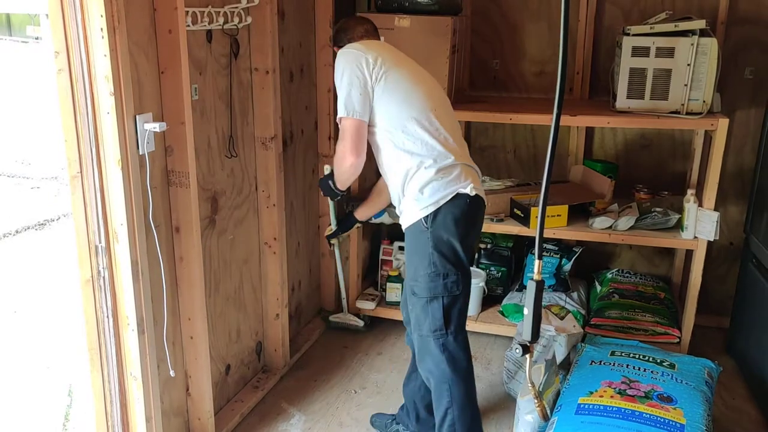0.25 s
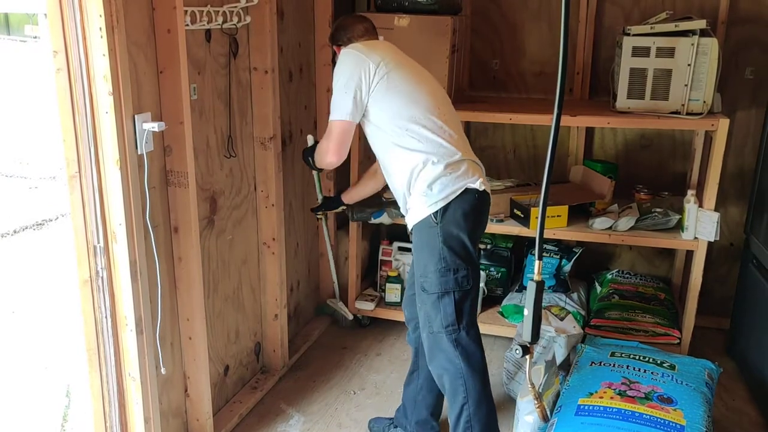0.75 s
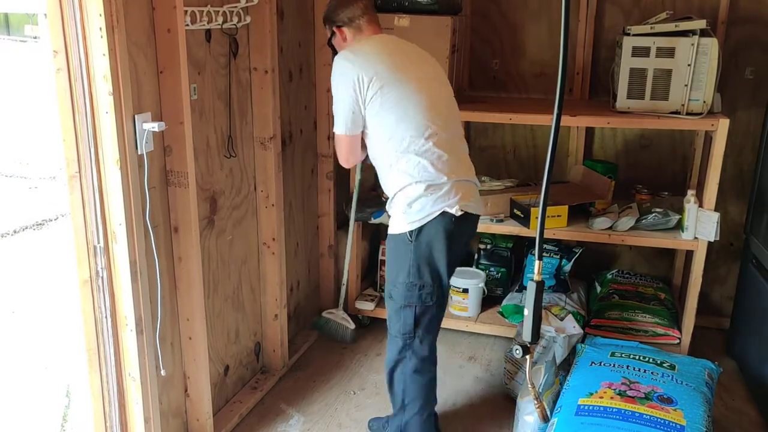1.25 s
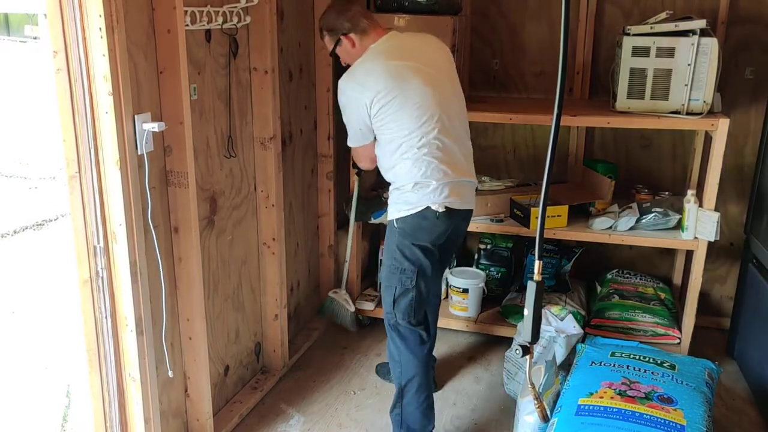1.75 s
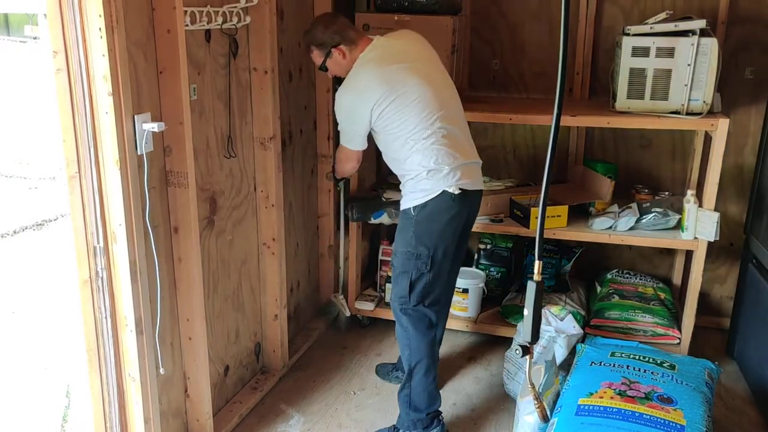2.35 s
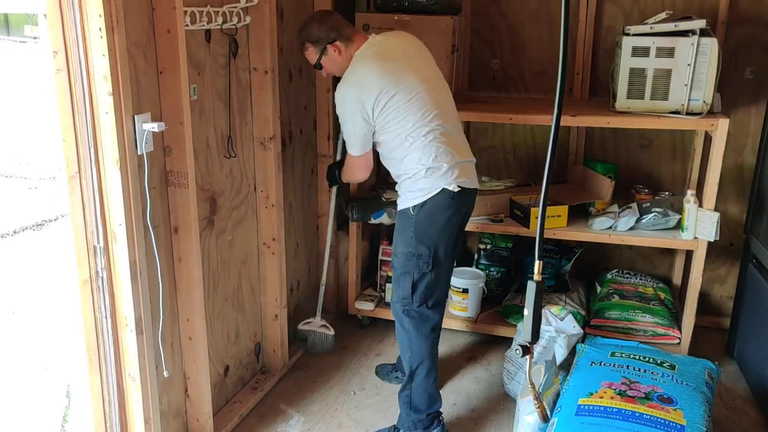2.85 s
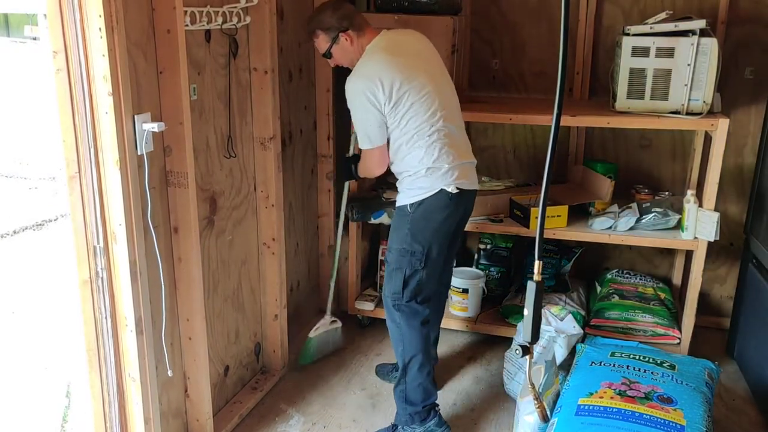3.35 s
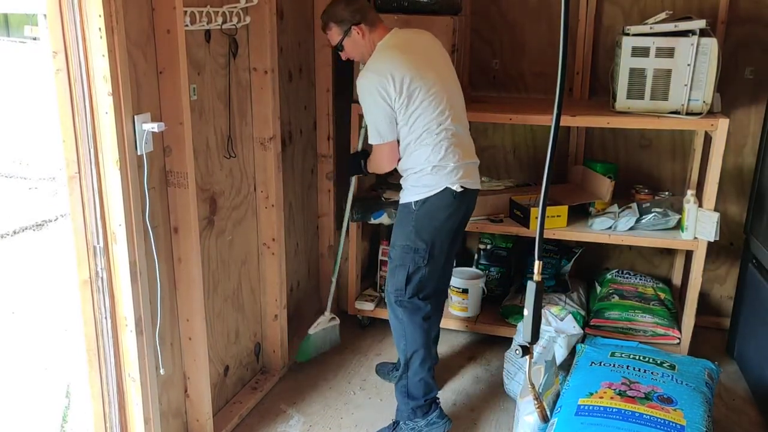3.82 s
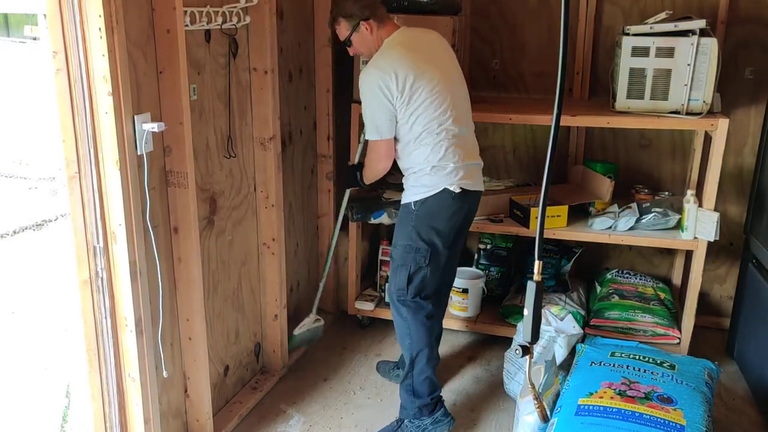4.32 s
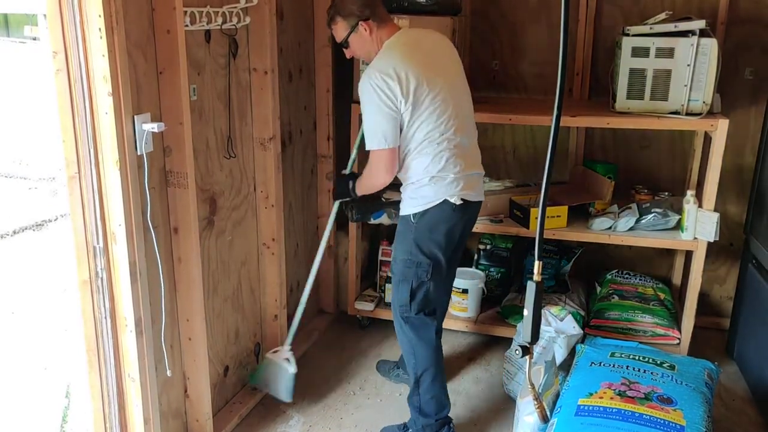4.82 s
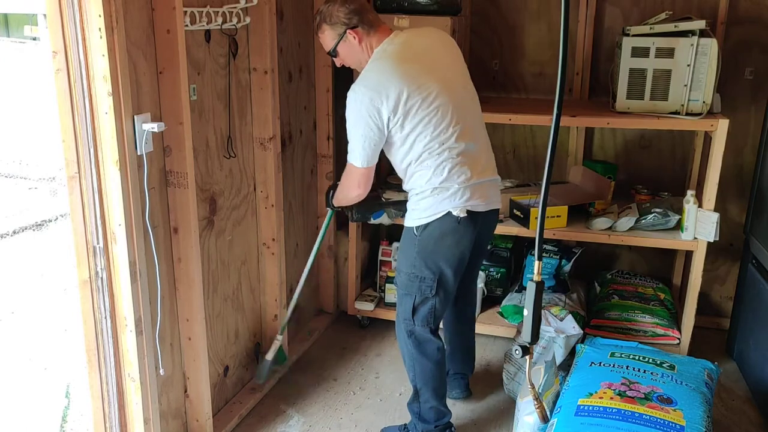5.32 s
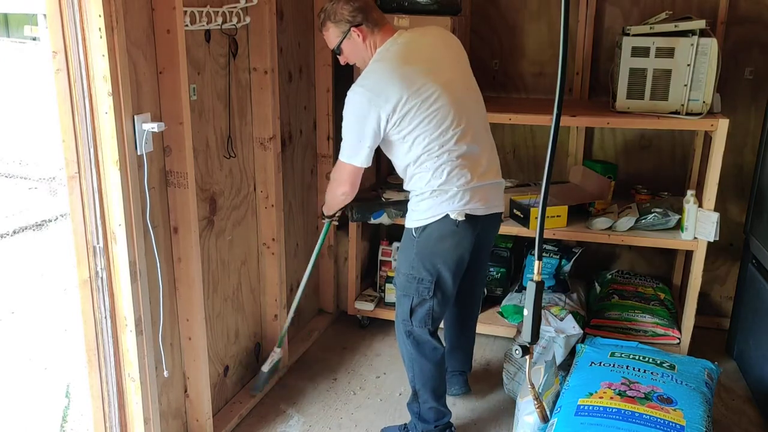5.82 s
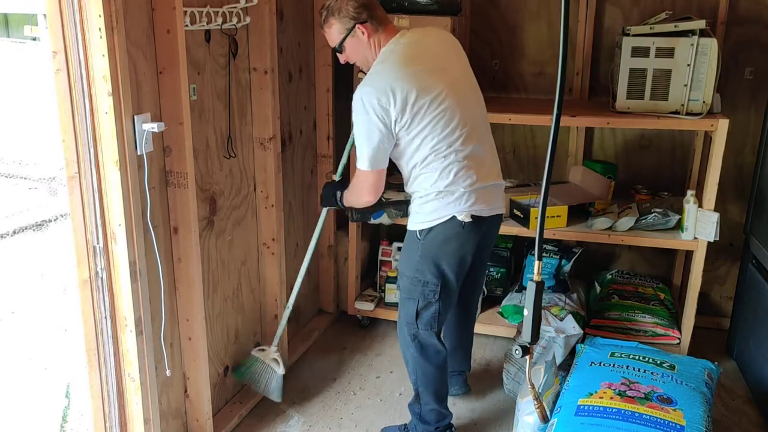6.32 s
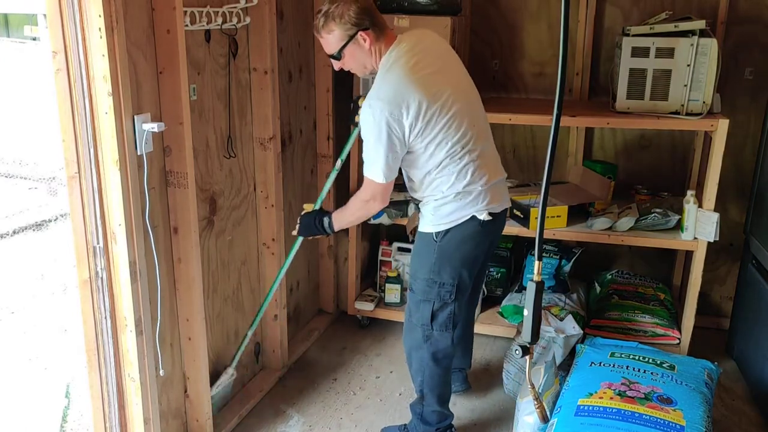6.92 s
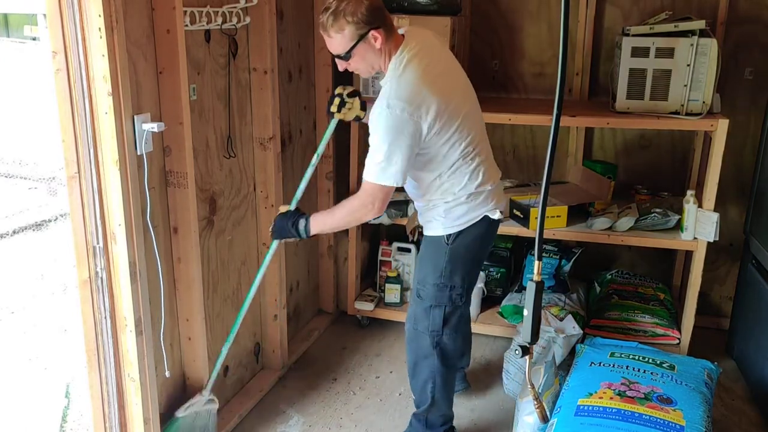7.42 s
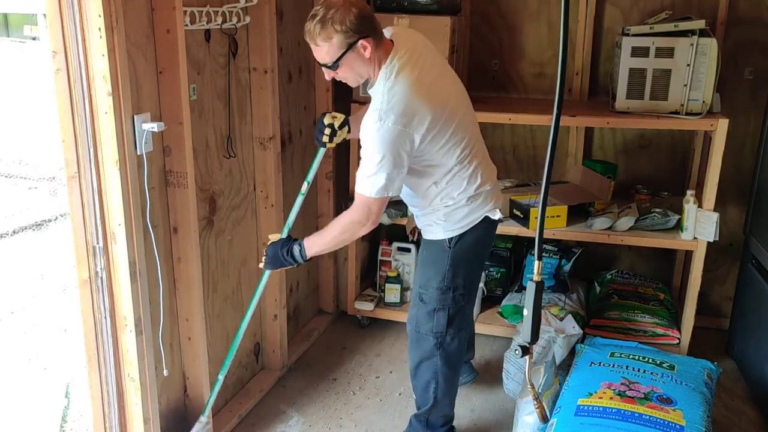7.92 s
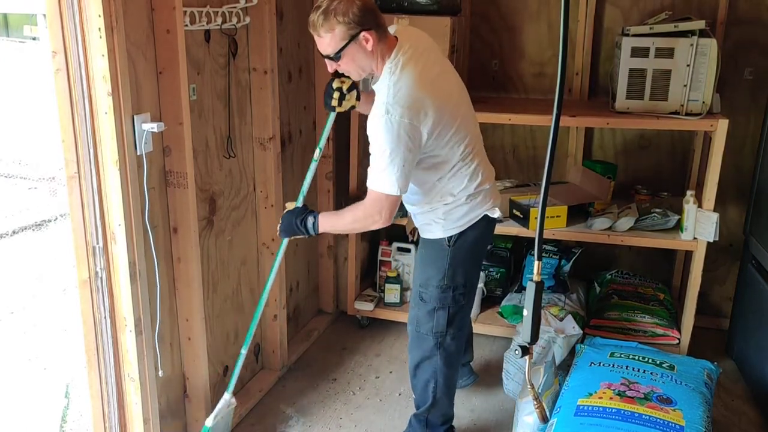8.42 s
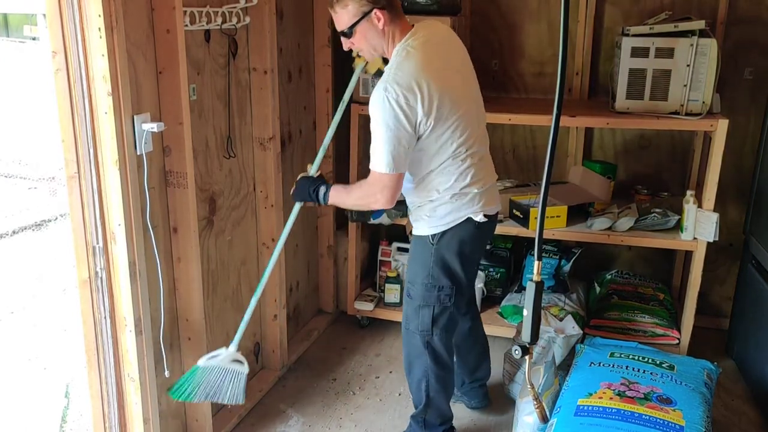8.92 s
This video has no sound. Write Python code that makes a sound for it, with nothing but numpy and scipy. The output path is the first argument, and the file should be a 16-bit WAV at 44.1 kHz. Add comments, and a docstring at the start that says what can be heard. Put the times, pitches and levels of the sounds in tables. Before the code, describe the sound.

A few steps from a stereo microphone, someone sweeps a small wooden shed. Brisk dry bristle scrapes come first, then hollow knocks around two and a half seconds, a cluster of bright grit clicks, and a double clack past five. After a softer patch, strong separate strokes return with thumps and low, trembling rumble through the boards. Close, short room echo; very quiet background; sound leans slightly left.

```python
"""Inside a small wooden shed, a broom sweeps a plank floor along a stud wall.
Shaped noise with sparse slips makes the bristles hiss and scratch and the planks answer; joists rumble as noise.
The broom head knocks and grit ticks: short band-passed clicks that ring the modes of studs and panels.
Two beating tones near 28 and 23 Hz make the whole shed shudder. A stereo microphone stands a few steps away."""
import sys
import numpy as np
from scipy import signal
from scipy.fft import rfft, irfft, next_fast_len
from scipy.io import wavfile
from scipy.ndimage import uniform_filter1d, map_coordinates

SR = 44100
rng = np.random.default_rng(int(sys.argv[2]) if len(sys.argv) > 2 else 0)


def pcm_store(signal):
    """Save signal as 16-bit PCM."""
    levels = np.round(np.clip(np.atleast_2d(signal), -1, 1) * 32767)
    wavfile.write(sys.argv[1], SR, levels.astype(np.int16).T)


def gain_from_db(level_db):
    """Convert decibel levels to linear amplitude factors (20 dB per decade)."""
    decades = np.asarray(level_db, float) / 20
    return 10 ** decades


N = 404397
TIME = np.arange(N) / SR  # s

# idle shed and the air outside: f/Hz, relative density/dB
QUIET_COLOUR = [(35, -34), (60, 6), (91, -8.5), (389, -10), (767, -15.5), (4530, -19.5), (6430, -26.5),
                (8710, -32.5), (14900, -26), (16000, -37)]
QUIET_DB = -60  # mean level of the bed
# likeness of the two microphone ports: f/Hz, likeness/1
PORT_LIKENESS = [(60, 0.93), (150, 0.93), (300, .85), (600, 0.47), (1200, 0.035), (4000, 0.022),
                 (12000, 0.017)]

# bristle strokes: fullest contact t/s, rise/s and fade/s over 20 dB (signs ignored), scratch level/dB, tip level/dB
STROKES = [(.056, 0.1, 0.15, -38.5, -51.5), (.208, 0.03, 0.17, -42.5, -50), (0.453, .8, 0.1, -50, -59),
           (.78, .1, 0.09, -41.5, -56), (1.042, 0.11, 0.14, -43.5, -55.5), (1.28, .03, 0.13, -41, -51.5),
           (1.616, 0.03, 0.24, -48, -77), (1.758, 0.6, -0.5, -54, -61), (1.868, .012, .3, -38, -41),
           (1.895, .08, .16, -37, -38), (2.029, 0.01, 0.18, -37.5, -55), (2.356, .015, .3, -46.5, -56),
           (2.426, 0.15, 0.2, -45, -56), (2.721, 0.08, -0.7, -46, -63), (2.866, .11, 0.72, -40, -51),
           (3.042, .006, 0.37, -39.5, -55.5), (3.44, .3, .35, -42, -70), (3.61, .01, .2, -45, -62),
           (3.69, .12, .3, -47, -60), (3.87, .45, .24, -45, -59), (4.048, .02, 0.33, -42.5, -59),
           (4.19, 0.1, 0.14, -57, -57), (4.39, .03, 0.33, -47.5, -54), (4.528, 0.3, 0.22, -55, -61.5),
           (4.975, .02, .3, -55, -62), (5.035, .1, .35, -51, -60), (5.116, .006, .17, -44, -49),
           (5.27, .012, .15, -47, -62), (5.312, .06, .2, -42, -60), (5.566, 0.55, .065, -49, -52),
           (5.826, .008, .3, -52, -54), (5.87, .06, .36, -46, -52), (6.151, -0.12, .26, -47, -55),
           (6.278, 0.06, 0, -55, -56), (6.49, .12, .2, -55.5, -58), (6.7, .2, 0.22, -52, -56),
           (6.709, -0.01, 0.14, -36.5, -51), (7.02, .06, 0.7, -48, -56), (7.5, 0.04, 0.56, -50.5, -58),
           (7.568, 0.04, 0.18, -39.5, -44.5), (7.937, 0.14, 0.2, -40, -45.5), (8.27, 0.15, 0.28, -41, -48),
           (8.47, -0.03, 0.05, -42.5, -60), (8.647, 0.07, 0.31, -47, -50), (8.731, .008, 0.13, -35, -45.5),
           (8.9, .015, .2, -47, -58), (8.975, .11, .115, -39.5, -57)]
TIPS_STEEPER = 1.19  # the tip hiss comes and goes this much faster than the scratch
# colours of bristle scratch, fine tip hiss and floor planks: f/Hz, relative density/dB
SCRATCH_COLOUR = [(700, -8), (1300, -3.5), (2500, -3.5), (4200, -1.5), (5200, -6), (6800, -11),
                  (8500, -27.5), (12000, -22.5)]
TIP_COLOUR = [(3500, -10), (6500, 19.5), (9000, 11.5), (12000, 11), (15500, 15.5), (17000, -34)]
PLANK_COLOUR = [(250, -20), (420, -3), (700, -1), (1100, 0), (1700, -4), (2600, -14), (5000, -35)]
# what the planks take up of the scratch as the broom moves along: t/s, level over scratch/dB
PLANK_UPTAKE = [(0, -8.5), (.3, -10), (.8, -12), (1.1, -19), (1.6, -14), (2.1, -16), (2.7, -7), (2.9, -6.5),
                (3.8, -4), (4.15, -12), (4.9, -6), (5.08, -3), (5.4, -4.5), (6.2, -11), (7.2, -8),
                (7.53, -0.5), (8, -6.5), (8.33, -3), (8.7, -15), (9.04, 0)]

# jolts from the sweeper's weight and the landing broom: t/s, peak shudder level/dB, joist rumble level/dB
JOLTS = [(.04, -60, -44.5), (.2, -41, -44), (.59, -60, -57), (.79, -58, -53), (1.0, -60, -55),
         (1.27, -38, -49), (1.43, -49, -50), (1.62, -46, -45), (1.73, -52, -48), (2.02, -28, -54),
         (2.36, -38, -55), (2.7, -40, -60), (3.05, -56, -52), (3.31, -34.5, -51), (3.55, -50, -52),
         (3.72, -30, -45), (4.045, -29, -57), (4.375, -28.5, -58), (4.76, -46, -47), (5.0, -40, -52),
         (5.28, -50, -39), (5.48, -35, -52), (5.86, -38.5, -59), (6.18, -34.5, -61), (6.7, -27.5, -44),
         (7.06, -29, -49), (7.38, -48, -58), (7.5, -55, -47), (7.565, -22.5, -44), (7.915, -23, -54),
         (8.25, -22, -42), (8.57, -41, -60), (8.72, -24.5, -51), (8.92, -48, -42)]
SHUDDER_HZ = 28  # nominal upper of the two shudder modes
BEAT_HZ, NEIGHBOUR = 5.4, .62  # the neighbouring mode: how far below in Hz, and its relative amplitude
SHUDDER_T60, NEIGHBOUR_T60 = .85, .85  # ring times in s
IDLE_DB = -63  # the shed never quite rests: mean peak level
# humps of the floor joists: f/Hz, relative density/dB
JOIST_COLOUR = [(35, -18), (52, -1), (75, 3.5), (105, -4), (155, -1.6), (205, -8), (255, -4), (330, -9),
                (420, -10), (600, -24.5), (1000, -92)]
JOIST_LAG_S, JOIST_RISE_S, JOIST_FADE_S = .03, .07, .36  # peak after the jolt; rise and fade over 20 dB

# broom head on wood, levels before the contact mix: t/s, tick level/dB, thud level/dB, thud f/Hz, knock level/dB
HEAD_KNOCKS = [(.194, -46, -35.5, 150, -43.5), (.269, -44, -36.5, 124, -51), (.5824, -52, -45, 160, -62),
               (1.267, -21.5, -32.5, 237, -40.5), (1.4139, -49, -37, 163, -49.5),
               (1.6155, -32, -57, 245, -40.5), (1.735, -55, -41, 140, -61), (2.029, -24, -34, 135, -34),
               (2.359, -30.5, -45, 433, -45), (2.4109, -28, -31, 357, -23.5),
               (2.7082, -30, -28, 457, -21.5), (2.7185, -33, -24.5, 188, -24.5),
               (3.0436, -18, -46, 390, -36.5), (3.2694, -38, -37.5, 165, -46.5),
               (3.4313, -35, -43, 161, -50), (4.044, -40, -42, 134, -43.5), (4.092, -33.5, -44.5, 136, -46),
               (4.35, -58, -52, 150, -66), (4.3818, -28.5, -43.5, 115, -41.5), (4.58, -58, -49, 260, -64),
               (4.7617, -47, -33.5, 243, -53), (5.1134, -17, -57, 386, -44.5),
               (5.2727, -25.5, -27, 147, -39), (5.3052, -16, -26, 140, -33), (5.4859, -35, -38.5, 149, -42),
               (5.8242, -46, -51, 145, -54), (6.153, -38, -49.5, 147, -51), (6.7055, -30, -34, 165, -40),
               (7.0644, -33, -36.5, 147, -40.5), (7.5648, -22.5, -33, 175, -40),
               (7.9244, -19.5, -44, 159, -41.5), (7.9977, -23, -25.5, 410, -27.5),
               (8.2548, -25, -38, 164, -37), (8.297, -26, -22.5, 422, -20), (8.7303, -31, -47.5, 267, -36),
               (8.912, -33, -42, 145, -50), (8.972, -29, -48, 144, -39)]
# grit flicked against the wood, and the bright ticks of a few head knocks, before the contact mix: t/s, tick
# level/dB, tick f/Hz
GRIT_TICKS = [(.194, -28.5, 3800), (1.2496, -38, 4010), (3.162, -23.5, 4000), (3.2153, -27, 4420),
              (3.4305, -24, 4570), (3.445, -21, 3570), (3.5148, -28.5, 1570), (3.569, -23.5, 4250),
              (3.609, -16.5, 3900), (3.8498, -21, 4200), (3.8765, -19, 4260), (3.9534, -32.5, 4360),
              (4.1936, -28, 3860), (5.1134, -21, 3200), (5.386, -31, 2040), (5.591, -32, 4300),
              (5.824, -36, 4570), (5.87, -34, 3000), (5.97, -35, 2500), (6.036, -30, 3600),
              (6.1, -33, 4790), (6.7055, -22.5, 4380), (6.9555, -32, 2170), (7.224, -34.5, 2010),
              (7.3257, -31.5, 2380), (7.436, -34, 2440), (8.138, -24.5, 7060), (8.4646, -31, 2720),
              (8.6487, -21.5, 4140)]
# nominal modes of the stud wall: f/Hz
WALL_MODES = np.array([70, 120, 141, 165, 192, 235, 255, 277, 330, 380, 400, 428, 505, 570, 607, 660, 712,
                       780, 841, 903, 938, 1034, 1120, 1224, 1340, 1500, 1680, 1850, 2060, 2400])
UPPER_MODES = WALL_MODES > 460  # these knock, the lower ones thud
HEAD_TICK_HZ = 1680
HEAD_TICK_WIDE, GRIT_TICK_WIDE = 1.1, 1.3  # bandwidth over centre, per filter pass: the head clacks, grit clicks
GRIT_THUD_DB, GRIT_THUD_HZ, GRIT_KNOCK_DB = -35, 150, -27.5  # what a grain stirs in the wall, dB over its tick
CONTACT_SIZE = SR // 3  # samples in one contact
# what reaches the microphone of a tick: f/Hz, relative level/dB
TICK_AIR = [(300, -20), (1200, 0), (5200, 0), (7500, -12), (16000, -22)]
# decay of the shed's echo: f/Hz, t60/s
ECHO_T60 = [(100, 0.13), (500, 0.27), (2000, 0.28), (6000, 0.063), (14000, 0.089)]
# first answers of the near walls: nominal delay t/s, level/dB
NEAR_WALLS = [(.0034, -5), (.0056, -7), (.0093, -9), (0.0133, -5)]
# balance of the stereo image: f/Hz, left over right level/dB
LEFT_TILT = [(60, .2), (250, .4), (640, 1.8), (1400, 3), (3000, 3.4), (5500, -.5), (10000, 1.4),
             (15000, 1.2)]


def unit(x):
    """Scale to rms 1."""
    return x / np.sqrt(np.mean(x ** 2) + 1e-20)


def along(points, hz):
    """Read (Hz, value) points on a log frequency axis."""
    f, value = np.transpose(points)
    return np.interp(np.log(hz + 1), np.log(f + 1), value)


def wobble(rate):
    """Draw a smooth random curve with rate knots a second."""
    knots = rng.standard_normal(int(N * rate / SR) + 4)
    return map_coordinates(knots, [np.arange(N) * rate / SR])


def filtered(x, response):
    """Multiply the spectrum of x by a response of frequency."""
    m = next_fast_len(N + SR // 2)
    return irfft(rfft(x, m) * response(np.fft.rfftfreq(m, 1 / SR)), m)[..., :N]


def port_angle(hz):
    """Mid/side angle that gives the ports their likeness at each frequency."""
    return np.arccos(np.clip(along(PORT_LIKENESS, hz), -1, 1)) / 2


def spread(pair, colour):
    """Colour two unrelated signals and mix them to the likeness of the ports, rms 1."""
    def response(hz):
        return gain_from_db(along(colour, hz)) * [np.cos(port_angle(hz)), np.sin(port_angle(hz))]
    mid, side = filtered(pair, response)
    return unit(np.array([mid + side, mid - side]))


def swells(peak_s, level_db, rise, fade):
    """Level in dB of events that each climb to their peak and fade, added by power."""
    t = np.arange(0, N / SR + .002, .001)
    late = t - np.asarray(peak_s)[:, None]
    rise, fade = np.abs(np.reshape(rise, (-1, 1))), np.abs(np.reshape(fade, (-1, 1)))
    span = np.where(late < 0, rise, fade) + 1e-4
    event_db = np.asarray(level_db)[:, None] - 20 * np.abs(late) / span
    power = gain_from_db(2 * event_db).sum(0)
    return np.interp(TIME, t, 10 * np.log10(power + 1e-14))


def quiet():
    """The idle shed and the air outside: coloured noise whose level drifts slowly."""
    return gain_from_db(QUIET_DB + 1.4 * wobble(3.27)) * spread(rng.standard_normal((2, N)), QUIET_COLOUR)


def slips(per_s, spread_db, share):
    """Noise of countless bristles; sparse slips of uneven size carry the given share of its power."""
    sizes = gain_from_db(spread_db * np.minimum(rng.exponential(size=N), 3))
    snaps = (rng.random(N) < per_s / SR) * sizes
    flick = signal.lfilter([1], [1, -np.exp(-1 / (.0008 * SR))], snaps)  # decays with a 0.8 ms time constant
    return rng.standard_normal((2, N)) * np.sqrt(1 - share + share * unit(flick) ** 2)


def patchy(pair, depth_db):
    """The colour shifts from moment to moment as different bristles touch different wood."""
    z = signal.stft(pair, nperseg=256)[2]
    field = uniform_filter1d(rng.standard_normal(z.shape[1:]), size=6, axis=0)  # smooth over frequency
    field = uniform_filter1d(field, size=12, axis=1)  # and over time
    return signal.istft(z * gain_from_db(depth_db * unit(field)), nperseg=256)[1][:, :N]


def strokes():
    """Bristles dragged over wood: noise for the scratch, the tip hiss, and what the planks pass on."""
    s, rise, fade, scratch_db, tips_db = np.transpose(STROKES)
    scratch_db = swells(s, scratch_db, rise, fade)
    tips_db = swells(s, tips_db, rise / TIPS_STEEPER, fade / TIPS_STEEPER)
    planks_db = scratch_db + np.interp(TIME, *np.transpose(PLANK_UPTAKE))
    drag_db = 1.5 * wobble(25)  # the bristle bunches catch and let go together
    scratch = spread(patchy(slips(150, spread_db=5.5, share=0.096), depth_db=2.5), SCRATCH_COLOUR)
    tips = spread(slips(320, spread_db=5.0, share=0.23), TIP_COLOUR)
    planks = spread(patchy(slips(90, spread_db=6.5, share=0.12), depth_db=1.5), PLANK_COLOUR)
    return gain_from_db(scratch_db + drag_db) * scratch + gain_from_db(tips_db + drag_db) * tips + gain_from_db(planks_db + drag_db) * planks


def shudder():
    """Each jolt rings two low modes of the shed; they beat, so the note swells, dips and returns weaker."""
    out, t = np.zeros(N + 2 * SR), np.arange(SR) / SR
    for s, peak_db, _ in JOLTS:
        hz = SHUDDER_HZ * rng.uniform(.98, 1.02)
        phase = 2 * np.pi * (hz * t + rng.random())
        upper_mode = gain_from_db(-60 * t / SHUDDER_T60) * np.sin(phase)
        neighbour = NEIGHBOUR * gain_from_db(-60 * t / NEIGHBOUR_T60) * np.sin(phase - 2 * np.pi * BEAT_HZ * t)
        ring = (upper_mode - neighbour) * (1 - np.exp(-t / .012))  # the modes start against each other
        at = round(s * SR)
        out[at:at + SR] += gain_from_db(peak_db) * ring / np.abs(ring).max()
    idle = gain_from_db(IDLE_DB + 5 * wobble(6)) * np.sin(2 * np.pi * SHUDDER_HZ * TIME + 1.3 * wobble(3))
    return out[:N] + idle


def rumble():
    """The floor joists answer every jolt with a swell of low, humped noise."""
    s, _, level_db = np.transpose(JOLTS)
    lumps_db = 4 * wobble(14)  # the floor is jolted unevenly
    swell_db = swells(s + JOIST_LAG_S, level_db, JOIST_RISE_S, JOIST_FADE_S)
    return gain_from_db(swell_db + lumps_db) * spread(rng.standard_normal((2, N)), JOIST_COLOUR)


def wall_ring(thud_db, thud_hz, knock_db):
    """Decaying sines of the wall modes at both ports, low ones strongest near the thud pitch; and the upper ones."""
    hz, t = WALL_MODES, np.arange(CONTACT_SIZE) / SR
    count = len(hz)
    t60 = 0.34 * (hz / 200) ** -.45  # wood loses its high modes first
    swing = 1 - np.exp(-t * hz[:, None] / 1.9)  # a panel needs a few cycles to swing up
    # low modes far from the struck panel's pitch stay weak
    floor_db = np.where(hz < thud_hz, -9 - 2.5 * np.log2(thud_hz / hz), -19)
    near_db = np.maximum(-30 * np.abs(np.log2(hz / thud_hz)), floor_db)
    thin_db = -6 - 11 * np.maximum(np.log2(hz / 900), 0)  # the soft head hardly reaches the high modes
    level_db = np.where(UPPER_MODES, knock_db + thin_db, thud_db + near_db + 4.5)
    level = gain_from_db(level_db + rng.normal(0, 1.7, count))
    pitch = hz * rng.normal(1, 0.019, count)  # every spot on the wall is tuned a little differently
    port_phase = rng.normal(0, 1, (2, count, 1)) * hz[:, None] / 1100  # high modes differ between ports
    start = rng.uniform(0, 2 * np.pi, (count, 1)) + port_phase
    # each upper mode has a close twin in the next panel
    beat_hz = UPPER_MODES * hz * rng.uniform(0, 0.02, count)
    envelope = level[:, None] * gain_from_db(-60 * t / t60[:, None]) * swing * np.cos(2 * np.pi * beat_hz[:, None] * t)
    modes = envelope * np.sin(2 * np.pi * pitch[:, None] * t + start)
    return modes.sum(1), modes[0, UPPER_MODES].sum(0)


def tick(level_db, centre_hz, wide):
    """A click passed twice through a band-pass and dulled by the air, scaled to its peak level."""
    hz = np.fft.rfftfreq(CONTACT_SIZE, 1 / SR)
    width = wide * centre_hz
    band = (1j * hz * width / (centre_hz ** 2 - hz ** 2 + 1j * hz * width)) ** 2
    delay = np.exp(-2j * np.pi * hz * .0007)  # 0.7 ms
    click = irfft(gain_from_db(along(TICK_AIR, hz)) * band * delay, CONTACT_SIZE)
    return gain_from_db(level_db) * click / np.abs(click).max()


def echo():
    """A fresh stereo answer of the shed: near walls, then a noise tail whose bass is alike at both ports."""
    size = CONTACT_SIZE
    hz, t, z = signal.stft(rng.standard_normal((2, size)), SR, nperseg=256)
    angle = port_angle(hz)[:, None]
    mid, side = z[0] * np.cos(angle), z[1] * np.sin(angle)
    fade = gain_from_db(-60 * t / along(ECHO_T60, hz)[:, None])
    tail = signal.istft(np.array([mid + side, mid - side]) * fade, SR, nperseg=256)[1][:, :size]
    build_up = 1 - np.exp(-np.arange(size) / SR / 0.0055)
    tail *= gain_from_db(3.0) * build_up / np.linalg.norm(tail[0])
    for delay, db in NEAR_WALLS:
        late = np.round(delay * SR * rng.uniform(.92, 1.08, 2)).astype(int)
        tail[[0, 1], late] += gain_from_db(db)
    return tail


def contacts():
    """Each blow or grain ticks, rings the wall modes, and echoes."""
    out = np.zeros((2, N + 2 * CONTACT_SIZE))
    blows = [(s, tick_db, HEAD_TICK_HZ, HEAD_TICK_WIDE, *wall) for s, tick_db, *wall in HEAD_KNOCKS]
    grains = [(s, db, tick_hz, GRIT_TICK_WIDE, db + GRIT_THUD_DB, GRIT_THUD_HZ, db + GRIT_KNOCK_DB)
              for s, db, tick_hz in GRIT_TICKS]
    for s, tick_db, tick_hz, wide, *wall in blows + grains:
        ring, upper = wall_ring(*wall)
        click = tick(tick_db, tick_hz, wide)
        source = (click + gain_from_db(-7) * upper)[None, :CONTACT_SIZE // 2]
        wet = signal.fftconvolve(source, echo(), axes=1)
        at = round(s * SR)
        out[:, at:at + CONTACT_SIZE] += gain_from_db(-1.0) * ring + gain_from_db(-3.0) * click
        out[:, at:at + wet.shape[1]] += wet
    return out[:, :N]


def scene():
    """Broom, shed and the quiet under them."""
    return quiet() + strokes() + shudder() + rumble() + contacts()


def low_pass(x):
    """Removes everything above the highest recorded frequency."""
    return signal.sosfilt(signal.butter(12, 16370, fs=SR, output="sos"), x)


def record(dry):
    """The broom is nearer the left port: half the tilt lifts the left, half lowers the right."""
    sides = np.array([[1], [-1]])
    tilted = filtered(dry, lambda hz: gain_from_db(along(LEFT_TILT, hz) / 2 * sides))
    return low_pass(tilted)


dry = scene()
out = record(dry)
pcm_store(out)
```